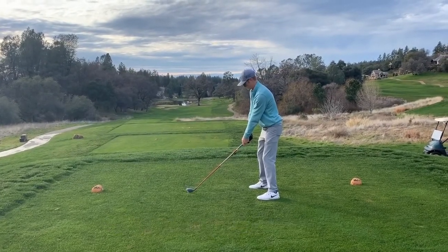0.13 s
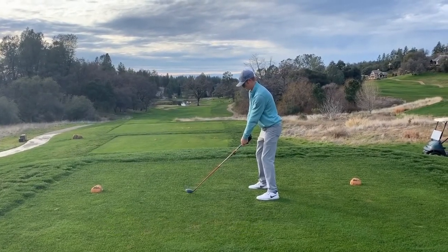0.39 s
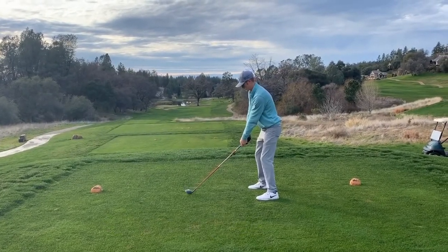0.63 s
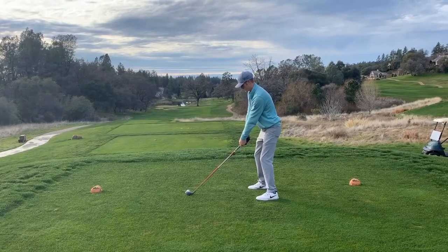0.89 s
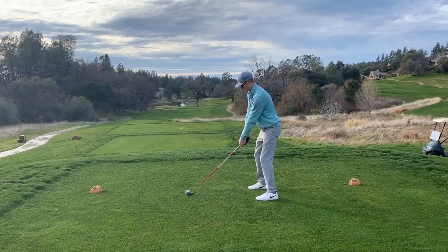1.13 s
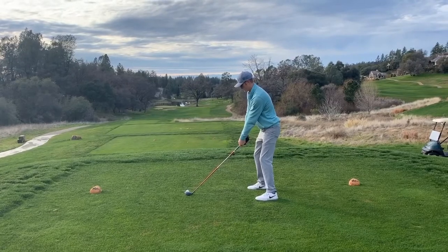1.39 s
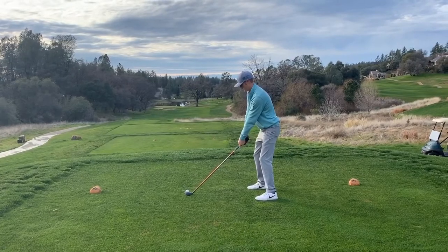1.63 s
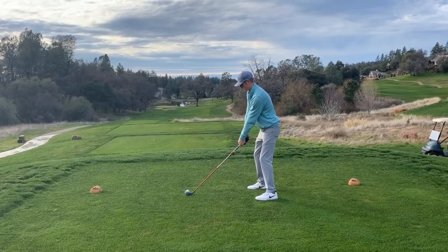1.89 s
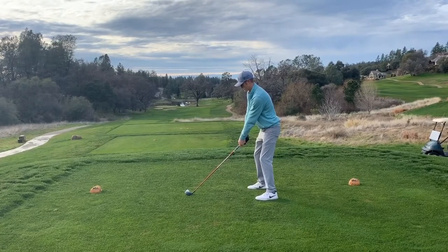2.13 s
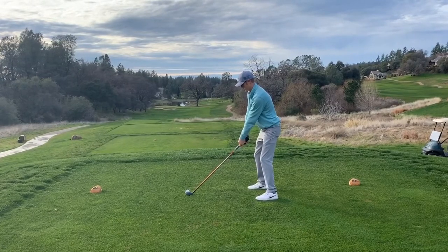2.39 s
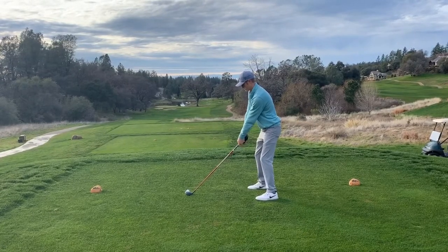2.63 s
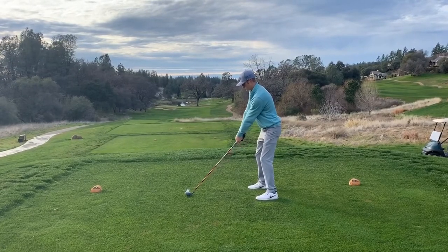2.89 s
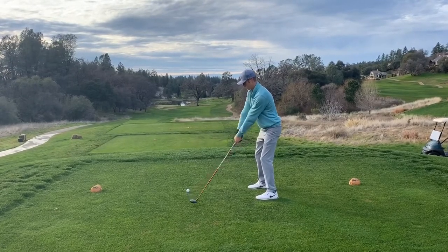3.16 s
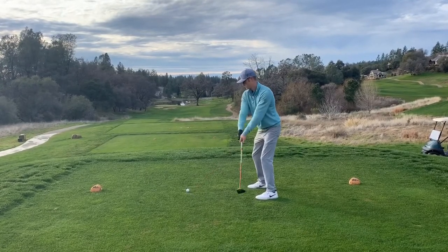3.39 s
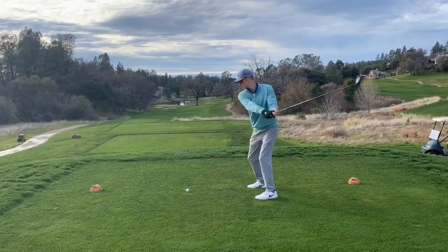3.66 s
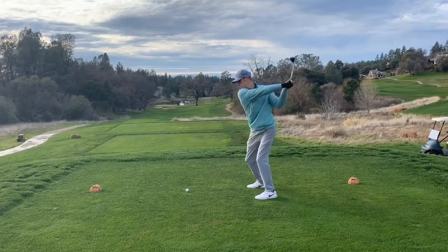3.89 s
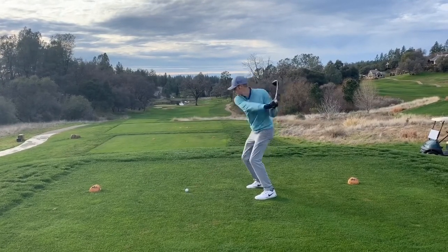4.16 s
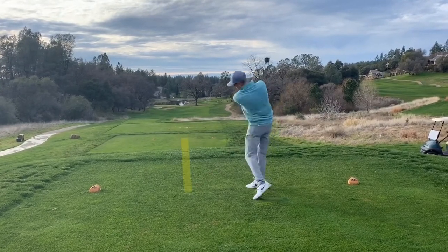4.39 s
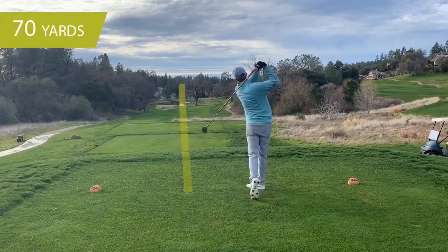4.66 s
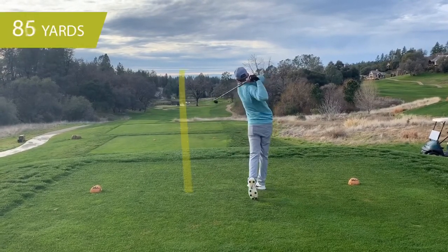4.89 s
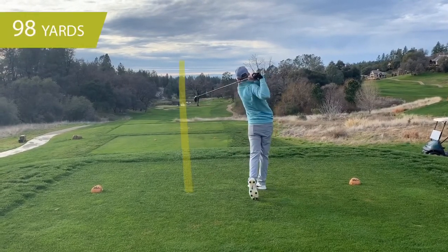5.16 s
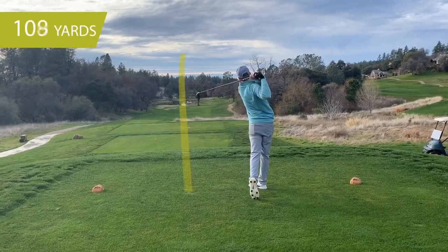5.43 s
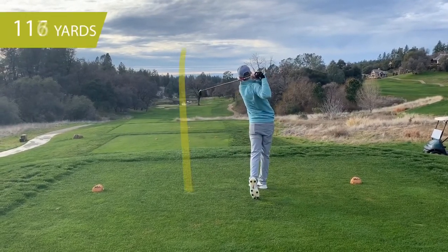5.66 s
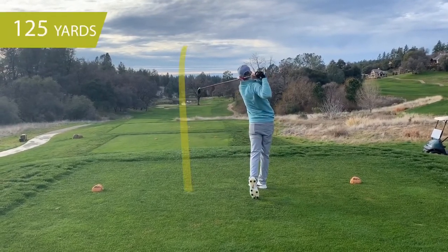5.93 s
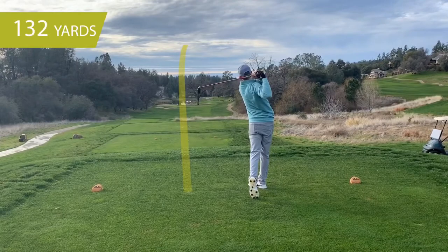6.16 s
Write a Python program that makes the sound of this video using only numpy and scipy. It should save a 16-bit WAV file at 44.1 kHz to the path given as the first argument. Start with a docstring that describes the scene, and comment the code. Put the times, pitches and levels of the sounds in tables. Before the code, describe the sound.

Small birds chirp over far traffic rumble; a club swishes and cracks hard against a golf ball, with a short bright ring and scattered echo.

```python
"""A hollow metal club head cracks against a teed ball and rings: decaying sine modes, beamed one by one and
Doppler-shifted up as the head swings round toward the microphone. A vortex whistle and rush of noise precede
the blow; slopes and trees echo it as delayed copies and a scattered noise tail. Cloth rustles. Far traffic
rumbles in filtered noise under a light hiss of air; small birds chirp and whistle as gliding sines."""
import sys
import numpy as np
from scipy import signal
from scipy.fft import rfft, irfft, next_fast_len
from scipy.io import wavfile
from scipy.ndimage import map_coordinates

SR = 44100
rng = np.random.default_rng(int(sys.argv[2]) if len(sys.argv) > 2 else 0)


def master(y):
    """Save y as 16-bit WAV."""
    cut = np.clip(np.atleast_2d(y).T, -1, 1)
    pcm = np.round(cut * 32767)  # scale
    wavfile.write(sys.argv[1], SR, pcm.astype(np.int16))


def volts_from_decibels(level):
    """Turn decibel levels (scalar or array-like) into linear amplitude factors."""
    exponent = np.asarray(level, float) / 20
    return 10 ** exponent


N = 277389
TIME = np.arange(N) / SR

# Every *_SPECTRUM: freq_hz, relative_db

# far road: time_s, deep_rumble_db, traffic_db
ROAD_LEVELS = [(0, -58, -73.5), (.28, -72, -74), (.66, -77.5, -71.5), (1.2, -69.5, -73), (1.75, -65.5, -71),
               (2.45, -61, -70), (3.31, -62.5, -73), (3.97, -63.5, -70), (4.7, -62.5, -68),
               (5.36, -63, -72), (6.29, -62.5, -73.5)]
# drone above the rumble: time_s, level_db
DRONE_LEVELS = [(0, -63.5), (.6, -68.5), (2.4, -69.5), (3.9, -65), (4.8, -68.5), (6.29, -67.5)]
RUMBLE_SPECTRUM = [(15, -38), (25, -10.5), (40, -5.5), (54, 0), (66, 0.5), (95, -5), (120, -37),
                   (210, -120)]
DRONE_SPECTRUM = [(53, -32.5), (90, -3.5), (139, 0.5), (173, -11.5), (220, -16), (290, -43.5), (480, -120)]
TRAFFIC_SPECTRUM = [(120, -30), (200, -2), (257, 0), (667, -5.5), (874, -4), (1050, -14), (1300, -30),
                    (2000, -80)]
TYRE_SPECTRUM = [(800, -30), (1050, 0.5), (1400, -1.5), (1750, -11), (2300, -15.5), (3000, -40)]
HISS_SPECTRUM = [(1060, -28.5), (1800, -2), (2180, -4), (3230, -4.5), (13200, -10.5), (14500, -20.5)]
# tyre hiss swings wider than the traffic: TYRE_GROWTH is in dB per dB
TYRE_DB, TYRE_GROWTH, TRAFFIC_MEAN_DB = -86, 1.5, -71.5

# many far birds: time_s, level_db
CHATTER_LEVELS = [(0, -95.5), (.5, -92), (1.1, -100), (2, -97), (3.4, -94), (4.5, -99), (6.29, -101)]
# chirps: start_s, length_s, first_hz, last_hz, level_db
CHIRPS = [(0.136, .065, 2414, 2420, -80), (.314, .057, 2370, 2500, -88), (.6, .039, 1950, 1920, -85.5),
          (1.067, 0.11, 1950, 1980, -89.5), (1.388, .036, 2320, 2300, -87), (1.579, 0.071, 3130, 3250, -85),
          (1.656, .08, 2700, 2650, -86), (1.73, .043, 1830, 1800, -81), (1.734, 0.055, 2240, 2206, -81),
          (1.741, .049, 3660, 3610, -87.5), (1.928, 0.043, 2660, 2740, -77), (1.938, .046, 3240, 3250, -87),
          (1.975, 0.038, 2700, 2710, -72), (2.028, 0.028, 2730, 2740, -86.5), (2.09, .04, 2700, 2740, -87),
          (2.295, 0.084, 3230, 3190, -76), (2.382, .022, 3240, 3230, -84), (2.465, 0.042, 3220, 3560, -80),
          (3.065, 0.064, 2740, 2520, -83), (3.14, 0.031, 2410, 2375, -82.5), (3.27, 0.032, 3600, 3450, -78),
          (3.36, .11, 3300, 3270, -96), (3.735, 0.028, 4070, 4150, -90), (3.85, .065, 3450, 4150, -87),
          (3.898, .06, 4150, 3850, -87), (4.99, 0.037, 3300, 2750, -88), (5.625, 0.026, 3200, 2970, -87),
          (5.958, .025, 3495, 3470, -84), (6.07, .053, 3520, 3450, -82), (6.088, .059, 2390, 2444, -82),
          (6.198, .045, 2410, 2470, -88.5)]
# soft blurred patches, far calls and a low rustle: start_s, length_s, centre_hz, spread_hz, level_db
BLURRED_PATCHES = [(1.56, .1, 3210, 248, -89), (1.56, .09, 3920, 149, -92),
                   (1.905, 0.072, 3200, 250, -86.5), (2.058, 0.065, 3400, 348, -89),
                   (2.835, 0.19, 1590, 345, -83.5), (3.92, 0.098, 2180, 250, -89),
                   (5.62, .1, 3340, 252, -95)]
# chips that dip and rise in pitch: centre_s, half_length_s, lowest_hz, end_hz, level_db
DIPPING_CHIPS = [(.654, 0.0053, 6700, 9000, -75), (.756, 0.0089, 6730, 8500, -83.5),
                 (5.54, .007, 6500, 7500, -81), (6.206, 0.0063, 6500, 7800, -81),
                 (6.28, .007, 6600, 7800, -89)]
# thin whistles that slide up, hold and drop off: start_s, length_s, held_hz, slide_hz, level_db
THIN_WHISTLES = [(1.565, 0.31, 6960, 550, -93), (2.01, 0.26, 7000, 400, -94), (4.937, .3, 7000, 300, -89.5),
                 (5.412, 0.36, 7060, 850, -79)]
SLIDE_S, SAG_HZ, SAG_S, SWELL_DB, CUT_S = 0.13, 230, 0.025, 15, 0.011

# cloth rustling as the player moves: time_s, level_db
RUSTLE_LEVELS = [(3.6, -100), (3.85, -88), (4.0, -86.5), (4.06, -88), (4.11, -81.5), (4.2, -110)]
CLOTH_SPECTRUM = [(800, -18.5), (1500, -2), (4000, -6), (7000, -9), (12000, -26.5)]

# vortices shed by the shaft: time_s, pitch_hz, whistle_db, rush_db
SHAFT_SWING = [(4.1, 600, -110, -100), (4.15, 650, -63.5, -61), (4.17, 760, -42, -48),
               (4.19, 740, -58.5, -46.5), (4.201, 880, -34, -41.5), (4.215, 860, -39.5, -44.5),
               (4.228, 830, -55.5, -47), (4.3, 800, -94, -64), (4.4, 800, -100, -88.5)]
RUSH_SPECTRUM = [(80, -26), (150, -14), (260, -8), (450, -12.5), (700, -11), (1000, -15.5), (1700, -21),
                 (2100, -23.5), (5500, -30.5), (8000, -50)]
SIZZLE_SPECTRUM = [(1500, -30), (3000, 0), (6300, -1), (14400, -9), (16500, -35)]

# single echoes of the blow: delay_s, level_db
SINGLE_ECHOES = [(.013, -23), (.074, -34), (.0966, -37), (0.19, -33)]
# the blow as the field returns it, lowest head mode standing out
FIELD_SPECTRUM = [(150, -20), (300, -8), (800, -9), (1960, -15), (3100, -16.5), (3800, -18), (4500, -13),
                  (4620, -2.5), (4750, -6), (6900, -6.5), (8020, -14), (14200, -23.5), (16500, -49)]
# head modes that stand out in the echoes: freq_hz, width_hz, level_db
FIELD_MODES = [(4596, 90, 4.5), (5293, 150, -2), (6750, 160, 2.5)]
# how fast each part of the scattered tail fades: freq_hz, fade_db_per_s
TAIL_FADES = [(1000, -2.5), (3500, 0.5), (4600, 34.5), (8000, 28.5), (14000, 60)]
# scattered echo builds, holds, then thins out
FIELD_RISE_S, FIELD_HOLD_S, FIELD_KNEE_S, FIELD_FALL_DB_PER_S = 0.012, 0.17, 0.027, 69.5
RING_DELAY_S, RING_SPREAD_S = 0.19, 0.085  # delays at which the scattered echo carries the ring

CONTACT_S = 4.21888
# head's approach speed, counted from its value at contact: time_s, speed_m_per_s
HEAD_APPROACH = [(4.219, 0), (4.235, 3), (4.25, 10.5), (4.27, 21), (4.29, 30), (4.33, 47)]
# head modes, each beamed once past the microphone as the head turns:
# freq_hz, level_db, t60_s, beam_gain_db, beam_time_s, beam_width_s
HEAD_MODES = [(4510, -46.5, .12, 29.5, 4.235, 0.0024), (4500, -41.5, 0.3, 13.5, 4.246, 0.004),
              (4880, -41.5, 0.26, 4, 4.242, .006), (5394, -22, 0.01163, -10, 4.232, .003),
              (5725, -44, 0.13, 12, 4.242, .003), (6314, -44.5, .15, -2.5, 4.262, .008),
              (6585, -46, 0.084, 29.5, 4.237, .003), (6780, -20, 0.018, -13.5, 4.226, .003),
              (7170, -49, .1, 22, 4.237, .003), (7450, -47, .1, 8, 4.238, .005),
              (7630, -26, 0.016, -11.5, 4.226, .003), (7440, -46, .1, 7.5, 4.245, .006),
              (8467, -42.5, 0.097, 12.5, 4.235, 0.0036), (8550, -45.5, .13, 12, 4.251, .005),
              (9550, -46, .15, 6, 4.242, 0.0021), (9987, -41, .08, 17.5, 4.236, 0.002),
              (11330, -46, 0.083, 8, 4.245, .005), (12010, -41.5, .09, 10, 4.245, .006),
              (12700, -51.5, .09, 9, 4.248, 0.00401), (13440, -42.5, 0.096, 14, 4.242, 0.0064),
              (14000, -30.5, 0.017, -6, 4.226, .003), (14340, -45.5, .07, 12.5, 4.233, .004)]
CRACK_SPECTRUM = [(180, -50), (300, -23), (1250, -15.5), (2600, -9), (3300, -20), (4930, -2.5), (5830, -6),
                  (6780, 1.5), (7500, -9.5), (8100, -18), (9180, -6), (11400, -15.5), (14000, -7.5),
                  (15700, -15), (16500, -53)]
# the many small modes of the shell
CLANG_SPECTRUM = [(1500, -36.5), (4000, -26.5), (4600, -5), (7000, -2), (14000, -11.5), (15700, -20),
                  (16500, -51)]
# a short falling knock, likely the squashed ball
POCK_DB, POCK_FIRST_HZ, POCK_LAST_HZ, POCK_SAG_S, POCK_PEAK_S = -25, 3300, 950, 0.0008, 0.0006


def unit(x):
    """Scaled to rms 1."""
    return x / np.sqrt(np.mean(x ** 2) + 1e-20)


def along(points, hz):
    """(Hz, value) points read on a log frequency axis."""
    f, v = np.transpose(points)
    return np.interp(np.log(hz + 1), np.log(f + 1), v)


def curves(rows):
    """One value per sample for each column after the time."""
    s, *cols = np.transpose(rows)
    return [np.interp(TIME, s, c) for c in cols]


def wobble(rate_hz, size=N):
    """A smooth random curve, rate_hz knots a second."""
    knots = rng.standard_normal(int(size * rate_hz / SR) + 4)
    return map_coordinates(knots, [TIME[:size] * rate_hz])


def coloured(x, spectrum):
    """x through a causal minimum-phase filter with the given dB spectrum."""
    m = 2 * next_fast_len(len(x) // 2 + 4096)
    log_gain = along(spectrum, np.fft.rfftfreq(m, 1 / SR)) * np.log(10) / 20
    cepstrum = irfft(log_gain, m)
    cepstrum[1:m // 2] *= 2  # fold onto positive time
    cepstrum[m // 2 + 1:] = 0
    return irfft(rfft(x, m) * np.exp(rfft(cepstrum)), m)[:len(x)]


def noise(spectrum):
    """Coloured noise of rms 1."""
    return unit(coloured(rng.standard_normal(N), spectrum))


def tone(hz):
    """A sine of rms 1 that follows a pitch curve from a random phase."""
    return np.sqrt(2) * np.sin(2 * np.pi * (np.cumsum(hz) / SR + rng.random()))


def air():
    """Lumpy rumble with a wavering hum in it, a drone, swelling traffic noise and a smooth high hiss."""
    deep_db, traffic_db = curves(ROAD_LEVELS)
    drone_db, = curves(DRONE_LEVELS)
    tyre_db = TYRE_DB + TYRE_GROWTH * (traffic_db - TRAFFIC_MEAN_DB)
    lumps_db = 2 * wobble(5) + 2.5 * wobble(16)
    hum = volts_from_decibels(-5.5 + 2 * wobble(10)) * tone(56 + 2.5 * wobble(4.3))
    deep = volts_from_decibels(deep_db) * unit(volts_from_decibels(lumps_db) * (noise(RUMBLE_SPECTRUM) + hum))
    drone = volts_from_decibels(drone_db) * unit(volts_from_decibels(lumps_db + 0.8 * wobble(25)) * noise(DRONE_SPECTRUM))
    swell = volts_from_decibels(0.15 * lumps_db + 0.75 * wobble(4.6))
    traffic = volts_from_decibels(traffic_db) * noise(TRAFFIC_SPECTRUM) + volts_from_decibels(tyre_db) * noise(TYRE_SPECTRUM)
    return deep + drone + swell * traffic + volts_from_decibels(-89) * noise(HISS_SPECTRUM)


def chatter(count):
    """A blur of faint short sine notes of random pitch, glide and size."""
    when, glide, size = rng.random((count, 3)).T
    t = np.arange(SR // 32) / SR
    centre_hz = 3100 + 500 * rng.standard_normal(count)
    hz = centre_hz[:, None] * (1 + 5 * (glide[:, None] - 0.5) * t)
    envelope = np.sin(np.pi * 32 * t) ** 2
    notes = volts_from_decibels(5 * size)[:, None] * envelope * np.sin(2 * np.pi * np.cumsum(hz, 1) / SR)
    at = (when * N).astype(int)[:, None] + np.arange(len(t))
    blur = np.bincount(at.ravel(), notes.ravel(), N + SR)[:N]
    return volts_from_decibels(curves(CHATTER_LEVELS)[0]) * unit(blur)


def whistles():
    """One shape for all: pitch slides up to a held note and sags at the cut, while the level swells."""
    song = np.zeros(N)
    for start_s, length_s, held_hz, slide_hz, level_db in THIN_WHISTLES:
        t = np.clip(TIME - start_s, 0, length_s)
        slide = slide_hz * np.clip(1 - t / SLIDE_S, 0, 1)
        sag = SAG_HZ * np.exp((t - length_s) / SAG_S)
        hz = held_hz - slide - sag + 15 * wobble(50)
        edges = np.clip(np.minimum(t, length_s - t) / CUT_S, 0, 1)
        shape = edges * volts_from_decibels(-SWELL_DB * (1 - t / length_s) ** 2)
        song += volts_from_decibels(level_db + 1.4 * wobble(40)) * shape * tone(hz)
    return song


def birds():
    """Warbling sine notes and soft patches blurred by leaves on the way; chips and whistles left clear."""
    song = chatter(count=1800)
    warble = 1 + 0.0098 * wobble(120)
    for start_s, length_s, first_hz, last_hz, level_db in CHIRPS:
        u = np.clip((TIME - start_s) / length_s, 0, 1)
        hz = (first_hz + (last_hz - first_hz) * u) * warble
        song += volts_from_decibels(level_db) * np.sin(np.pi * u) * tone(hz)
    for start_s, length_s, centre_hz, spread_hz, level_db in BLURRED_PATCHES:
        u = np.clip((TIME - start_s) / length_s, 0, 1)
        song += volts_from_decibels(level_db) * np.sin(np.pi * u) * tone(centre_hz + spread_hz * wobble(300))
    song *= volts_from_decibels(1.61 * wobble(90))
    leaves = rng.standard_normal(SR // 4) * volts_from_decibels(-60 * TIME[:SR // 4] / 0.16)  # t60 0.16 s
    song += volts_from_decibels(-7.5) * signal.fftconvolve(song, leaves / np.linalg.norm(leaves))[:N]
    for centre_s, half_s, lowest_hz, end_hz, level_db in DIPPING_CHIPS:
        u = np.clip((TIME - centre_s) / half_s, -1, 1)
        envelope = (1 - u ** 4) * volts_from_decibels(-6 * u ** 2)
        song += volts_from_decibels(level_db) * envelope * tone(lowest_hz + (end_hz - lowest_hz) * u ** 2)
    return song + whistles()


def cloth():
    """Uneven rustle of sleeves: noise with a flickering level."""
    return volts_from_decibels(curves(RUSTLE_LEVELS)[0] + 2.5 * wobble(67)) * noise(CLOTH_SPECTRUM)


def swing():
    """Shaft whistle at its vortex rate, with a weak octave, in a rush of air that brightens as it grows."""
    hz, whistle_db, rush_db = curves(SHAFT_SWING)
    hz = hz * (1 + 0.03 * wobble(150))
    whistle = volts_from_decibels(1.5 * wobble(130)) * (tone(hz) + volts_from_decibels(-15) * tone(2 * hz))
    sizzle_db = -7 + 0.4 * (rush_db + 42)
    rush = noise(RUSH_SPECTRUM) + volts_from_decibels(sizzle_db) * noise(SIZZLE_SPECTRUM)
    return volts_from_decibels(whistle_db) * whistle + volts_from_decibels(rush_db + 2.5 * wobble(80)) * rush


def single_echoes(hit):
    """A few dulled copies from hard faces, each keeping a short ring."""
    # the ring is beamed, the crack goes everywhere
    early = hit * volts_from_decibels(-60 * np.clip(TIME - CONTACT_S, 0, 1) / 0.06)
    dull = coloured(early, [(500, 8), (1500, -4), (5000, 1.5), (9000, -9), (16000, -24)])
    t = TIME[:SR // 20]
    modes = 0 * t
    for freq_hz, width_hz, _ in FIELD_MODES:
        decay = np.exp(-np.pi * width_hz * t)
        modes += 2 * np.pi * width_hz / SR * decay * np.cos(2 * np.pi * freq_hz * t)
    dull = dull + volts_from_decibels(8) * signal.fftconvolve(dull, modes)[:N]
    return sum(volts_from_decibels(level_db) * np.roll(dull, round(delay_s * SR)) for delay_s, level_db in SINGLE_ECHOES)


def scattered_echo():
    """A scattered noise tail that fades at a rate set by frequency and carries the head's ring."""
    hz, t, z = signal.stft(rng.standard_normal(SR), SR, nperseg=512)
    late_s = FIELD_KNEE_S * np.logaddexp(0, (t - FIELD_HOLD_S) / FIELD_KNEE_S)  # soft knee
    fade_db = -FIELD_FALL_DB_PER_S * late_s - along(TAIL_FADES, hz)[:, None] * t
    peaks = sum(volts_from_decibels(level_db) / (1 + (2 * (hz - freq_hz) / width_hz) ** 2)
                for freq_hz, width_hz, level_db in FIELD_MODES)
    ring = 1 + peaks[:, None] * np.exp(-((t - RING_DELAY_S) / RING_SPREAD_S) ** 4)
    tail = signal.istft(z * volts_from_decibels(fade_db) * ring, SR, nperseg=512)[1][:SR]
    grain = volts_from_decibels(1.6 * wobble(180, size=SR))  # trunks and mounds return uneven pieces
    rise = 1 - np.exp(-TIME[:SR] / FIELD_RISE_S)
    tail = unit(coloured(tail * grain * rise, FIELD_SPECTRUM))
    return volts_from_decibels(-63.5) * np.pad(tail, (round(CONTACT_S * SR), N))[:N]


def head_ring(t):
    """Decaying head modes, Doppler-shifted up and beamed as the head turns toward the microphone."""
    at_s = t + CONTACT_S
    doppler = 1 + np.interp(at_s, *np.transpose(HEAD_APPROACH)) / 343  # speed of sound, m/s
    ring = 0 * t
    for freq_hz, level_db, t60_s, beam_gain_db, beam_time_s, beam_width_s in HEAD_MODES:
        beam = 1 + volts_from_decibels(beam_gain_db) * np.exp(-0.5 * ((at_s - beam_time_s) / beam_width_s) ** 2)
        flutter_db = 1.5 * wobble(150, size=len(t))  # each mode's level flutters a little at random
        ring += volts_from_decibels(level_db - 60 * t / t60_s + flutter_db) * beam * tone(freq_hz * doppler)
    return ring * (1 - np.exp(-t / 0.0001))


def blow():
    """Impact of face on ball: a sharp crack and a falling knock, then the ring and clang of the shell."""
    t = np.arange(SR // 4) / SR
    ring = head_ring(t)
    burst = volts_from_decibels(-60 * t / 0.0032) * rng.standard_normal(len(t)) * 0.21
    burst[0] += 1  # the face meets the ball
    crack = coloured(burst, CRACK_SPECTRUM)
    crack = volts_from_decibels(-5.5) * crack / abs(crack).max()
    clang = unit(coloured(rng.standard_normal(len(t)), CLANG_SPECTRUM)) * volts_from_decibels(-31.5 - 60 * t / 0.17)
    pock_hz = POCK_LAST_HZ + (POCK_FIRST_HZ - POCK_LAST_HZ) * np.exp(-t / POCK_SAG_S)
    pock_shape = t / POCK_PEAK_S * np.exp(1 - t / POCK_PEAK_S)
    pock = volts_from_decibels(POCK_DB) * pock_shape * tone(pock_hz)
    return np.pad(pock + ring + crack + clang, (round(CONTACT_S * SR), N))[:N]


def scene():
    """Everything summed at one microphone."""
    hit = blow()
    echoes = single_echoes(hit) + scattered_echo()
    return (air() + birds() + cloth() + swing() + echoes + hit)[None]


def band_limit(x):
    """A steep low-pass at the top of the band."""
    return signal.sosfilt(signal.butter(12, 16660, fs=SR, output="sos"), x)


def record(dry):
    """The finished mix as delivered."""
    return band_limit(dry)


dry = scene()
out = record(dry)
master(out)
```